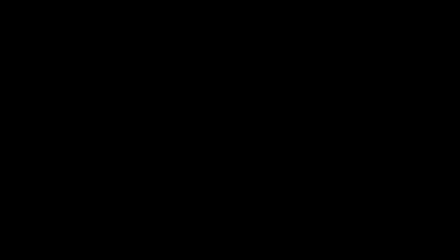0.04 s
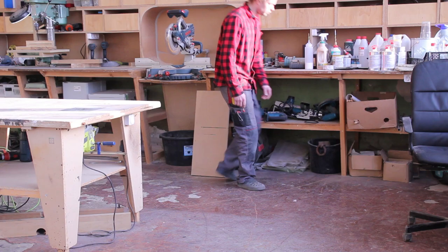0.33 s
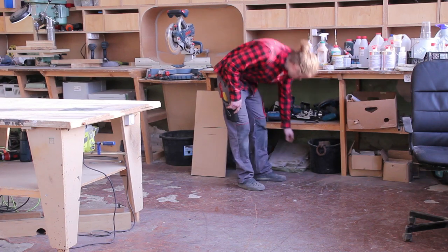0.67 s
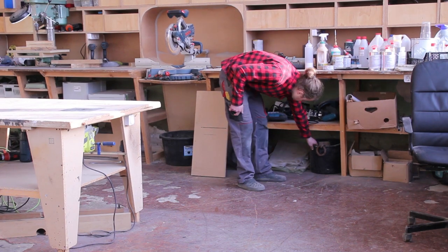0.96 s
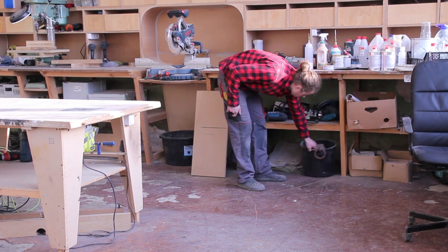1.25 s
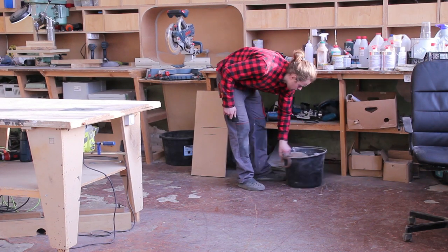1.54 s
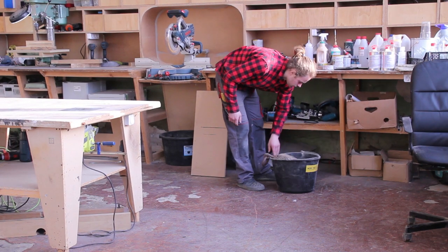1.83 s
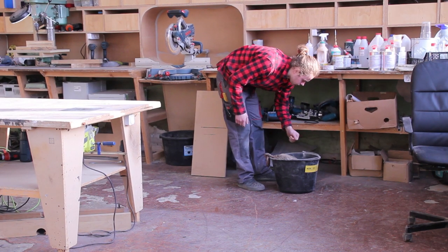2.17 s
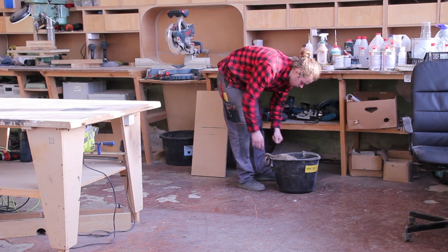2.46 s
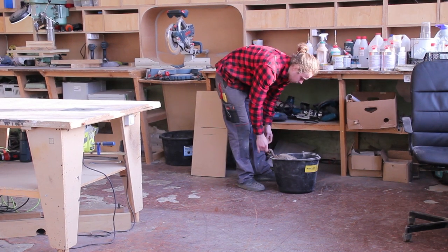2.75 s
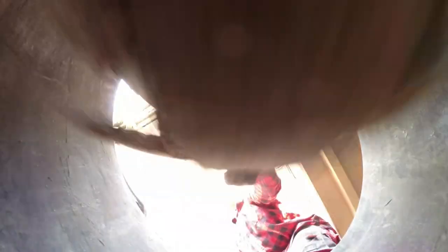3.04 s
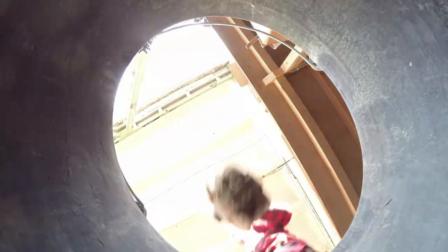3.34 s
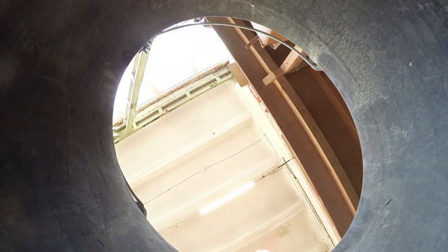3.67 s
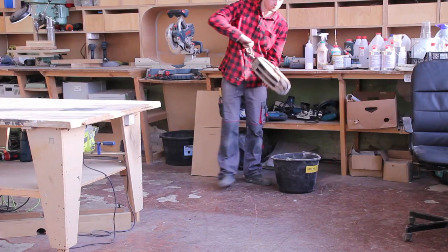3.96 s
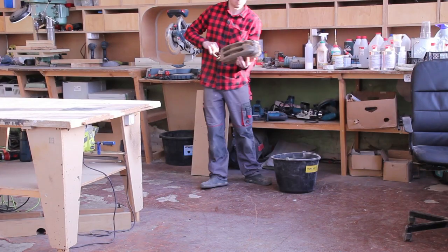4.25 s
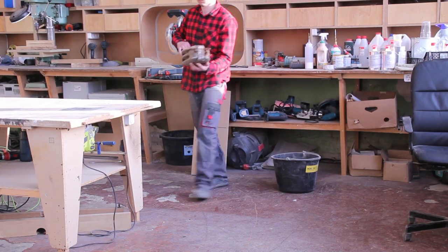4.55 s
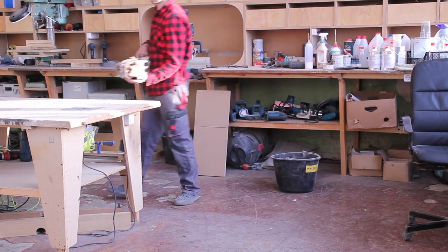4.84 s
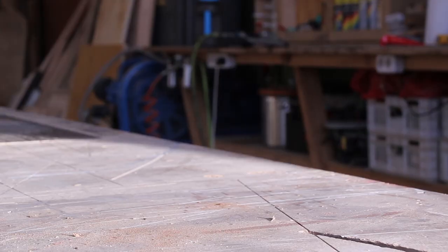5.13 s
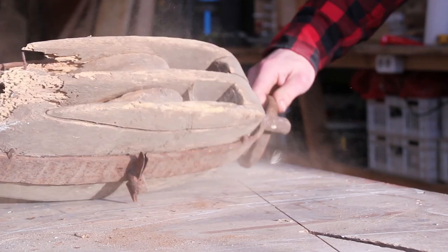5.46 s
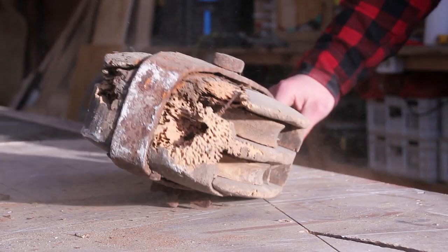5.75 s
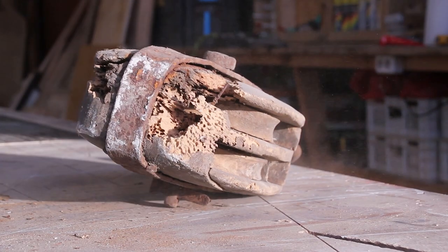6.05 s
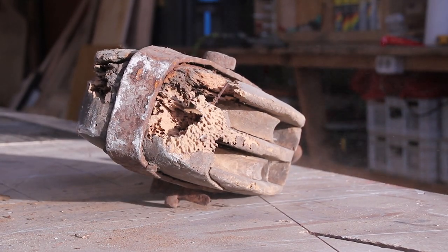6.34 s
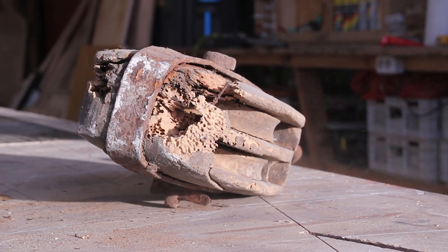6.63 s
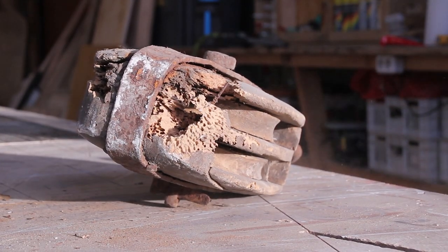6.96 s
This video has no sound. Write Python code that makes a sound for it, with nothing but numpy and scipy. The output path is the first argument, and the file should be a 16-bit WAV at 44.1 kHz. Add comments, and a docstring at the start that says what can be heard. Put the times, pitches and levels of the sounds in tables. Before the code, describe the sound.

Faint cricket-like chirps sit over quiet workshop room tone. A plastic tub scrapes across grit, then thuds and clacks as an old wooden block is hauled out, shedding chips into it. A soft hiss fills a short lull. Then comes the loudest sound, near the microphone: the block crashes onto a wooden table and rocks, rotten wood crunching, dust spraying and crumbs clicking down.

```python
"""Faint high chirps, like bush crickets, run throughout over room tone, with a far bird now and then.
At 1.2 s a plastic tub is dragged over a gritty workshop floor. An old iron-strapped pulley block knocks
about in it, is scraped up the wall and out by 3.1 s, and sheds chips that tock back into the tub.
A soft hiss swells in the pause. At 5.4 s the block slams onto a wooden table and rolls: the top booms,
rotten wood crunches, dust sprays and crumbs patter down."""
import sys
import numpy as np
from scipy import signal
from scipy.fft import rfft, irfft, next_fast_len
from scipy.io import wavfile

SR = 44100
rng = np.random.default_rng(int(sys.argv[2]) if len(sys.argv) > 2 else 0)


def generate_wav(sig):
    """Save sig (samples, or channels by samples) to the path in sys.argv[1] as 16-bit PCM at SR."""
    pcm = np.round(np.clip(np.atleast_2d(sig).T, -1, 1) * 32767).astype(np.int16)
    wavfile.write(sys.argv[1], SR, pcm)


N = 308635
T = np.arange(N) / SR
HIT_T = T[:16384]  # time axis of a one-shot
FFT_SIZE = next_fast_len(N)

# Cues for the drag, the lift and the landing.
DRAG_START_S, TUG_S, DROP_S, DRAG_STOP_S = 1.158, 1.784, 1.982, 2.27
GRIP_S, SHIFT_S, LIFT_S, CLEAR_S, TUB_STILL_S = 2.375, 2.41, 2.675, 3.075, 3.64
SLAM_S, CRASH_S, TIP_S, REST_S = 5.3912, 5.446, 6.37, 6.715

# Tone of the landing, from the blow to the debris. Each row: frequency in Hz, level in dB.
BLOW_EQ = [(60, -26.5), (200, -15.5), (450, 0.5), (900, -4.5), (1400, -5.5), (3000, -10), (8000, -34),
           (16000, -36.5)]
CRACK_EQ = [(120, -39), (200, -37), (401, -2.5), (569, -4), (916, -8.5), (1080, -7), (1370, -28.5),
            (2750, -12), (5420, -20), (6400, -14), (7970, -22), (11900, -25), (16000, -52.5)]
TABLE_EQ = [(25, -15), (45, -16.5), (85, -8), (115, -4.5), (150, -0.5), (205, 2.5), (250, -2), (365, -1.5),
            (540, -5.5), (650, -14), (720, -9), (1000, -29)]
CRUNCH_EQ = [(290, -35.5), (500, -12.5), (561, -4.5), (787, -3.5), (1130, -2), (1610, -5.5), (1720, -4.5),
             (2210, -7.5), (2400, -8), (2940, -13.5), (3240, -12.5), (3710, -23), (4200, -16.5),
             (5460, -41), (9240, -120)]
DULL_CRUNCH_EQ = [(290, -30.5), (500, -15.5), (629, 1), (662, -5.5), (875, -7), (1210, -5), (1330, -9),
                  (1760, -13.5), (2510, -14.5), (2640, -14), (3800, -27), (4940, -50), (8360, -120)]
COARSE_DUST_EQ = [(1760, -18), (3000, 3), (3240, -2.5), (5220, -4), (6300, -5.5), (9010, -11), (12500, -14),
                  (16000, -19)]
FINE_DUST_EQ = [(1880, -23.5), (3200, -9), (4990, -9), (7280, -4), (9340, -4.5), (11100, 1), (15200, -5),
                (16000, -5)]
CRUMB_EQ = [(500, -34), (2000, -8), (4000, -8.5), (7000, -0.5), (12000, 2), (16000, -1)]
# Tone of the tub dragging over grit and stones. Each row: frequency in Hz, level in dB.
TUB_WALL_EQ = [(500, -20), (1000, -11), (1170, -10), (1270, -0.5), (1380, 2), (1490, -12), (1650, 0),
               (1780, -6.5), (2370, -8.5), (2900, -13.5), (4500, -27.5), (9000, -44)]
TUB_DRONE_EQ = [(70, -10.5), (130, -2.5), (210, 0.5), (310, -2), (420, -4), (700, -8), (950, -10.5),
                (1200, -32.5)]
GRIT_EQ = [(1000, -28), (2000, 0), (3300, -1), (5000, -2.5), (7000, -0.5), (10000, 0), (13000, -2),
           (16000, -9)]
STONE_EQ = [(1500, -8), (5000, -9.5), (9000, -2), (11000, 9.5), (16000, -3.5)]
# Tone of the block and its chips moving in the tub. Each row: frequency in Hz, level in dB.
CLACK_EQ = [(180, -33), (300, -7.5), (486, -5.5), (589, -10.5), (1180, -6.5), (1650, -0.5), (2130, -7),
            (2310, -4), (2760, -2), (3190, -17), (3510, -10), (4060, -30.5), (4400, -23.5), (14000, -70.5)]
CHAFE_EQ = [(900, -13), (1300, -4), (1800, 2), (2400, -6), (3100, -0.5), (3600, -22), (7000, -29)]
RASP_EQ = [(600, -2.5), (950, -2.5), (1900, 4), (3200, -3.5), (3900, -13), (4500, -6.5), (5200, -14.5),
           (7300, -16.5), (10000, -31.5), (15000, -41.5)]
HOLLOW_RUB_EQ = [(41, -38), (70, -8), (199, 0), (284, -1), (464, -21.5), (533, -14.5), (653, -22.5),
                 (750, -22.5), (900, -43), (1170, -68.5), (1980, -120)]
TUB_SWAY_EQ = [(15, -9.5), (30, -1), (42, -9), (60, -14), (85, -15.5), (120, -24), (300, -63.5)]
CHIP_TOCK_EQ = [(300, -13), (1100, -14), (1850, 0.5), (2200, -3.5), (2650, 0.5), (3400, -16), (4500, -21),
                (6500, -33), (9000, -44), (14000, -63)]
CHIP_CLICK_EQ = [(2000, -9.5), (3800, 1.5), (6500, -6.5), (9000, -12), (14000, -22)]
# Tone of the cricket wings, the soft hiss and the room. Each row: frequency in Hz, level in dB.
WING_EQ = [(4000, -54.5), (7000, -26.5), (8500, -19.5), (9500, -8), (11000, -3), (12500, -3.5),
           (14900, -14.5), (16000, -23)]
WASH_EQ = [(300, 0), (900, -1.5), (1700, -2), (2500, 2), (3500, -4), (5000, -11), (9000, -17.5)]
ROOM_EQ = [(20, -6.5), (33, -3), (55, -5), (85, -8.5), (160, -16.5), (235, -18), (320, -26), (1300, -36),
           (2400, -40), (8500, -43.5), (13000, -44.5), (16000, -49)]

# Resonances of wood, iron and plastic. Each row: pitch in Hz, level in dB, seconds to fall 60 dB.
BLOCK_MODES = [(543, 1.5, 0.12), (618, -5, 0.3), (1260, -4.5, 0.19), (1810, -9.5, .3), (1960, -2.5, 0.42),
               (2435, 0.5, .25), (2780, -8.5, .3)]
IRON_MODES = [(2396, -3.5, 0.23), (2930, -0.5, 0.052), (4200, -10.5, 0.075), (4530, -8.5, 0.14),
              (4730, -8, 0.16), (6202, -31.5, 0.14)]
STRAP_MODES = [(2932, -4, 0.26), (2930, -11, .15), (5900, -16, 0.15)]
TUB_WALL_MODES = [(100.6, -6, 0.064), (197.8, 1.5, 0.087), (245, -1, 0.12), (325, -10, 0.077),
                  (433, -11, 0.11)]
TUB_BOTTOM_MODES = [(35.8, -6, 0.34), (123, 0, 0.16)]

# The block rocking on the table. Each row: start in seconds, bump, crunch and snap levels in dB,
# decay in seconds.
BREAK_HITS = [(5.453, -19.5, -21, -20, 0.018), (5.525, -19, -16, -25, 0.02),
              (5.696, -39, -17.5, -14, 0.0035), (5.888, -36, -23, -36.5, .0088),
              (5.928, -20, -32, -39, 0.0057), (5.974, -28, -18, -32.5, 0.0062),
              (6.095, -40, -31, -40, 0.007), (6.374, -26.5, -39, -66, 0.0048),
              (6.641, -48, -36, -57, 0.0085)]
# Large crumbs landing. Each row: start in seconds, click level in dB, strap ping level in dB.
CRUMB_HITS = [(5.6136, -21, -70), (5.722, -13, -70), (5.932, -19, -72), (5.9624, -24, -70),
              (6.06, -16.5, -70), (6.187, -22, -62), (6.252, -23, -70), (6.5033, -17, -40.5),
              (6.521, -18, -60), (6.576, -14.5, -49), (6.7067, -23.5, -50.5), (6.737, -26, -65),
              (6.7517, -19, -51), (6.805, -34.5, -50.5), (6.8758, -23, -59), (6.9022, -28, -55),
              (6.9606, -24.5, -49.5)]
# Stones catching under the tub. Each row: start in seconds, level in dB.
STONE_HITS = [(1.249, -27), (1.306, -20), (1.375, -9.5), (1.481, -11.5), (1.799, -20), (1.826, -16),
              (2.058, -19), (2.139, -16.5)]
# The block knocking in the tub. Each row: start in seconds, wall thud, bottom drum and clack levels
# in dB, clack decay in seconds, iron ring level in dB.
KNOCK_HITS = [(1.604, -53, -70, -20, 0.0023, -80), (1.984, -33, -46, -24, .007, -79),
              (2.003, -34, -40, -23.5, 0.0072, -77), (2.493, -16.5, -55, -35, 0.011, -49.5),
              (2.572, -14, -47.5, -35, 0.0065, -26), (2.624, -12, -42.5, -15, 0.0096, -54),
              (2.6696, -17, -20, -10, 0.0073, -47), (2.76, -50, -27.5, -44, .007, -80),
              (3.086, -27, -20.5, -17, .008, -52)]
# Chips falling into the tub. Each row: start in seconds, tock level in dB, click level in dB.
CHIP_HITS = [(3.119, -20, -72), (3.1509, -31, -37), (3.1557, -24, -43), (3.1742, -29, -57),
             (3.186, -36, -75), (3.2057, -26.5, -60), (3.306, -34.5, -73), (3.3294, -33.5, -70),
             (3.388, -35, -80), (3.4211, -17, -50), (3.4253, -28, -45), (3.5103, -41, -46.5),
             (3.585, -37.5, -45), (3.6487, -32.5, -27.5), (3.8248, -36.5, -37.5), (3.8922, -39, -45)]
# Cricket chirps. Each row: start in seconds, level of the last stroke in dB.
CRICKET_CHIRPS = [(0.135, -43.5), (.379, -60), (.615, -62), (.874, -50), (2.08, -42.5), (2.55, -59.5),
                  (2.675, -61), (2.95, -50), (3.277, -49), (3.659, -59), (3.924, -43), (4.418, -51),
                  (4.808, -49.5), (5.2, -59), (6.352, -53), (6.727, -53)]
# A far bird. Each row: start and length in seconds, first and last pitch in Hz, level in dB.
BIRD_NOTES = [(.865, 0.06, 2000, 1910, -75), (4.806, 0.054, 2096, 1970, -60),
              (4.84, 0.052, 2250, 2430, -62)]
# Swells of soft hiss. Each row: centre and half width in seconds, level in dB.
HISS_SWELLS = [(4.03, 0.15, -66), (4.45, 0.65, -68.5), (5.16, .18, -64)]
# The room tone's fader. Each row: time in seconds, level in dB.
ROOM_FADER = [(.07, -49.5), (1.1, -52.5), (2.3, -52.5), (4.0, -49), (5.3, -50), (7, -52)]
# How alike the room is in both ears. Each row: frequency in Hz, correlation from 0 to 1.
ROOM_CORRELATION = [(30, 0.34), (120, 0.2), (500, 0.44), (2000, .15), (12000, 0.022)]


def slam():
    """The block lands: a heavy blow, then a crack as the wood gives."""
    out = np.zeros(N)
    add(out, SLAM_S, amp(5.5) * burst(BLOW_EQ, .004))
    add(out, SLAM_S + .0083, amp(-9) * burst(CRACK_EQ, .004) + amp(-15.5) * burst(CRACK_EQ, .017))
    return out


def block_roll(fade_db_per_s=5.5):
    """The table booms and rotten wood crunches as the block crashes on its side, rolls and tips."""
    roll = envelope(SLAM_S, attack_s=.014, hold_s=.62, fall_db_per_s=35.5)
    roll *= amp(-fade_db_per_s * np.maximum(T - SLAM_S, 0)) * judder(rate_hz=40, depth_db=1.17)
    boom_gain = (amp(-23.5) * roll
                 + amp(-16.5) * envelope(CRASH_S, attack_s=.04, hold_s=.063, fall_db_per_s=220)
                 + amp(-37) * envelope(TIP_S, attack_s=.0085, hold_s=.095, fall_db_per_s=45))
    crunch_gain = (amp(-26.5) * roll
                   + amp(-26.5) * envelope(CRASH_S, attack_s=.016, hold_s=.077, fall_db_per_s=282)
                   + amp(-50.5) * envelope(TIP_S, attack_s=.16, hold_s=.046, fall_db_per_s=15))
    boom = stereo(table_boom(), table_boom(), .7 * crash_width()) * boom_gain
    crunch = stereo(wood_crunch(), wood_crunch(), .3 * crash_width()) * crunch_gain
    return (amp(-2) * boom + amp(-.83) * crunch) * until(REST_S, release_s=.011)


def table_boom():
    """Small blows keep the table top's many modes going."""
    return unit_rms(echoes(grains(TABLE_EQ, 3000, .7), t60=.24, wet_db=-8))


def wood_crunch():
    """Fractures ring the rotten block; the crunch dulls and the ring comes up as the roll dies out."""
    dullness = np.clip((T - 5.8) / .58, 0, 1)
    cracks = np.sqrt(1 - dullness) * grains(CRUNCH_EQ, 3000, 2.5)
    cracks += np.sqrt(dullness) * grains(DULL_CRUNCH_EQ, 3000, 2.4)
    ringing = unit_rms(signal.oaconvolve(cracks, ring(BLOCK_MODES))[:N])
    crunch = unit_rms(echoes(cracks * judder(60, 1), t60=.19, wet_db=-5))
    return crunch + amp(-18.5 + 14.5 * dullness) * ringing


def crash_width():
    """The crash spreads wide, then draws in to the centre."""
    return .006 + envelope(CRASH_S, attack_s=.0055, hold_s=.091, fall_db_per_s=140)


def breaks():
    """The rocking block bumps the table and snaps off splinters."""
    out = np.zeros(N)
    for start, bump_db, crunch_db, snap_db, decay_s in BREAK_HITS:
        add(out, start, amp(bump_db) * burst(TABLE_EQ, 2 * decay_s))
        add(out, start, amp(crunch_db) * burst(CRUNCH_EQ, decay_s))
        add(out, start, amp(snap_db) * burst(COARSE_DUST_EQ, decay_s))
    return out


def dust():
    """Coarse dust puffs on the slam, sprays on the crash and spills in the roll; fine dust trickles on."""
    puff = envelope(SLAM_S, attack_s=.01, hold_s=.02, fall_db_per_s=121)
    spray = envelope(CRASH_S, attack_s=.012, hold_s=.015, fall_db_per_s=207)
    spill = envelope(SLAM_S, attack_s=.02, hold_s=.38, fall_db_per_s=50)
    trickle = np.clip((T - SLAM_S) / .02, 0, 1)
    width = .083 + .37 * crash_width()
    coarse = stereo(grains(COARSE_DUST_EQ, 5500, 3.8), grains(COARSE_DUST_EQ, 6000, 4), width)
    coarse *= amp(-34.5) * puff + amp(-24) * spray + amp(-38) * spill
    fine = stereo(grains(FINE_DUST_EQ, 3500, 6.3), grains(FINE_DUST_EQ, 3500, 5.5), width=.67)
    return coarse + amp(-54.5) * fine * trickle


def crumbs(small_per_s=6, small_db=-27.5):
    """Crumbs click across the table, small ones at random among the large; some ping off the strap."""
    mid, side = np.zeros((2, N))
    small_starts = T[(rng.random(N) < small_per_s / SR) & (T > CRASH_S)]
    small = [(start, small_db, -np.inf) for start in small_starts]
    for start, click_db, ping_db in CRUMB_HITS + small:
        click = amp(click_db - 1) * tick(CRUMB_EQ, rattle_db=-15, rattle_s=.0017)
        add(mid, start, click)
        add(mid, start, amp(ping_db) * ring(STRAP_MODES, detune=.0052))
        add(side, start, rng.uniform(-1.2, 1) * click)
    return np.array([echoes(ear, t60=.1, wet_db=-10) for ear in stereo(mid, side, width=.66)])


def tub_drag(speed_up_s=.34, brake_s=.25, flat_db=-2):
    """Grit hisses under the tilted tub and shakes its walls with its speed; a tug, and it drops flat."""
    speed = np.clip((T - DRAG_START_S) / speed_up_s, 0, 1) * until(DRAG_STOP_S, brake_s) ** 2.28
    tilted = until(DROP_S + .036, release_s=.03)
    tug = envelope(TUG_S, attack_s=.053, hold_s=.07, fall_db_per_s=55) * tilted
    drop = envelope(DROP_S, attack_s=.0066, hold_s=.02, fall_db_per_s=152)
    scrape_gain = amp(flat_db * (1 - tilted))  # lying flat, it scrapes more softly
    wall = grains(TUB_WALL_EQ, 1200, 1.5) * amp(-28 + 1.4 * tug) * speed ** .97
    wall *= judder(rate_hz=32, depth_db=.66)
    hiss = grains(GRIT_EQ, 9000, 4.1) * amp(-28.5 + 6.3 * tug) * speed ** 1.17
    drone = grains(TUB_DRONE_EQ, 900, 2.1) * (amp(-39.5) * speed ** .81 + amp(-31.5) * drop)
    out = (scrape_gain * (wall + hiss) + drone) * judder(rate_hz=60, depth_db=1.38)
    for start, db in STONE_HITS:
        add(out, start, amp(db) * tick(STONE_EQ, rattle_db=-7.5, rattle_s=.002))
    return amp(-1) * echoes(out, t60=.064, wet_db=-7)


def tub_knocks(rebound_s=.0095, rebound_db=-4.5):
    """Each knock thuds the tub and rings the iron; the wood clacks, and again on the rebound."""
    out = np.zeros(N)
    soft_attack = 1 - np.exp(-HIT_T / .0025)  # rotten wood gives, so the ringing builds up
    for start, thud_db, drum_db, clack_db, decay_s, iron_db in KNOCK_HITS:
        thud = amp(thud_db - 3) * ring(TUB_WALL_MODES, detune=.064)
        drum = amp(drum_db) * ring(TUB_BOTTOM_MODES)
        iron = amp(iron_db) * ring(IRON_MODES)
        clack = amp(clack_db) * burst(CLACK_EQ, decay_s, attack_s=.00138)
        rebound = amp(clack_db + rebound_db) * burst(CLACK_EQ, .7 * decay_s, attack_s=.0012)
        add(out, start, soft_attack * (thud + drum + iron) + clack)
        add(out, start + rebound_s, rebound)
    return out


def block_slide(swell_db_per_s=66, cut_db_per_s=350):
    """A hand grips and shifts the block; it rasps ever louder up the wall, then the tub rocks to rest."""
    grip = envelope(GRIP_S, attack_s=.016, hold_s=.05, fall_db_per_s=1500)
    shift = envelope(SHIFT_S, attack_s=.061, hold_s=.19, fall_db_per_s=200)
    lift = envelope(LIFT_S, attack_s=.02, hold_s=.41, fall_db_per_s=330)
    haul = amp(np.minimum(swell_db_per_s * (T - CLEAR_S), cut_db_per_s * (CLEAR_S - T))) * (T > SHIFT_S)
    rocking = envelope(LIFT_S, attack_s=.015, hold_s=.44, fall_db_per_s=6)
    rocking *= until(TUB_STILL_S, release_s=.07)
    # The bottom springs up as the weight leaves it.
    heave = envelope(LIFT_S, attack_s=.015, hold_s=.072, fall_db_per_s=60)
    chafe = grains(CHAFE_EQ, 1200, 2.3) * amp(-47) * grip
    rasp = grains(RASP_EQ, 3000, 3.16) * judder(rate_hz=70, depth_db=1.9)
    rasp *= amp(-31) * haul + amp(-62) * (shift + rocking)
    rub = grains(HOLLOW_RUB_EQ, 500, 2.2) * judder(rate_hz=20, depth_db=1.6)
    rub *= amp(-37) * shift + amp(-41) * lift + amp(-39.5) * haul + amp(-56.5) * rocking
    sway = grains(TUB_SWAY_EQ, 800, 1.1)
    sway *= amp(-37.5) * heave + amp(-44.5) * lift + amp(-43.5) * rocking
    return chafe + rasp + rub + sway


def chips():
    """Chips drop back into the tub with a hollow tock; sharp ones also click."""
    out = np.zeros(N)
    for start, tock_db, click_db in CHIP_HITS:
        add(out, start, amp(tock_db) * tick(CHIP_TOCK_EQ, rattle_db=-6.5, rattle_s=.0023))
        add(out, start, amp(click_db) * tick(CHIP_CLICK_EQ, rattle_db=-4, rattle_s=.0014))
    return echoes(out, t60=.16, wet_db=-15.5)


def crickets(stroke_s=.029, spacing_s=.03, growth_db=4):
    """Three raspy wing strokes a chirp, building in level."""
    strokes = np.zeros(N)
    shape = np.sin(np.pi * np.minimum(HIT_T / stroke_s, 1)) ** 2
    for start, db in CRICKET_CHIRPS:
        for k, (jitter, jitter_db) in enumerate(rng.standard_normal((3, 2))):
            gain = amp(db - growth_db * (2 - k) + jitter_db)
            add(strokes, start + k * spacing_s + .002 * jitter, gain * shape)
    mid, side = (echoes(strokes * grains(WING_EQ, 2500, 2.8), t60=.18, wet_db=-7.5) for _ in range(2))
    return stereo(mid, side, width=.7)


def bird():
    """A few faint gliding whistles, far back in the reverb."""
    out = np.zeros(N)
    for start, length_s, first_hz, last_hz, db in BIRD_NOTES:
        hz = np.linspace(first_hz, last_hz, int(length_s * SR))
        add(out, start, amp(db) * np.hanning(len(hz)) * np.sin(2 * np.pi * np.cumsum(hz) / SR))
    return np.array([echoes(out, t60=.3, wet_db=3), echoes(out, t60=.22, wet_db=10.5)])


def wash():
    """A soft, wide hiss that comes and goes in the room."""
    gain = sum(amp(db) * np.exp(-((T - centre) / half_s) ** 2) for centre, half_s, db in HISS_SWELLS)
    return stereo(grains(WASH_EQ, 26000, .94), grains(WASH_EQ, 20000, .99), width=.5) * gain


def room_tone(low_cut_hz=12):
    """A bed of low rumble and thin hiss, only partly alike in the two ears."""
    hz = np.fft.rfftfreq(FFT_SIZE, 1 / SR)
    left, unrelated = rfft(rng.standard_normal((2, FFT_SIZE)))
    alike = curve_at(ROOM_CORRELATION, hz)
    right = alike * left + np.sqrt(1 - alike ** 2) * unrelated
    tone = amp(curve_at(ROOM_EQ, hz)) * hz ** 2 / (hz ** 2 + low_cut_hz ** 2)
    bed = irfft(np.array([left, right]) * tone, FFT_SIZE)[:, :N]
    fader_db = np.interp(T, *np.transpose(ROOM_FADER), left=-150, right=-150)
    return amp(fader_db - 1) * unit_rms(bed)


def grains(eq, per_s, spread_db):
    """Random tiny slips and fractures, a few of them large, ringing a body; rms 1."""
    chance, size, sign = rng.random((3, N))
    at = chance < per_s / SR
    clicks = np.zeros(N)
    clicks[at] = amp(spread_db * np.minimum(-np.log(size[at]), 4)) * np.sign(sign[at] - .5)
    return unit_rms(colour(clicks, eq))


def judder(rate_hz, depth_db):
    """The uneven gain of stick and slip."""
    rolloff = 1 + (np.fft.rfftfreq(FFT_SIZE, 1 / SR) / rate_hz) ** 4
    wobble = irfft(rfft(rng.standard_normal(FFT_SIZE)) / rolloff, FFT_SIZE)[:N]
    return unit_rms(amp(depth_db * unit_rms(wobble)))


def burst(eq, decay_s, attack_s=.00034):
    """A rough contact: dying noise through a body."""
    fade = np.exp(-HIT_T / decay_s) * (1 - np.exp(-HIT_T / attack_s))
    hit = colour(rng.standard_normal(len(HIT_T)) * fade, eq)
    return hit / np.linalg.norm(hit) * np.sqrt(decay_s * SR / 2)


def tick(eq, rattle_db, rattle_s):
    """A small hard impact: one sharp click and a brief rattle."""
    click = impulse_response(eq)
    return click / abs(click).max() + amp(rattle_db) * burst(eq, rattle_s)[:len(click)]


def ring(modes, detune=0):
    """Dying modes, detuned a little by where the blow lands."""
    out = np.zeros(len(HIT_T))
    for hz, db, t60 in modes:
        pitch = hz * (1 + detune * rng.uniform(-1.03, 1))
        out += amp(db - 60 * HIT_T / t60) * np.sin(2 * np.pi * pitch * HIT_T)
    return out


def echoes(x, t60, wet_db):
    """Adds a tail of sparse reflections that falls 60 dB in t60 seconds."""
    taps = rng.standard_normal(len(HIT_T)) * (rng.random(len(HIT_T)) < 2000 / SR)
    taps *= amp(-60 * HIT_T / t60)
    return x + amp(wet_db) * signal.oaconvolve(x, taps / np.linalg.norm(taps))[:N]


def impulse_response(eq, size=4096):
    """A body's minimum-phase click, energy 1, rolling off 18 dB an octave past the curve's ends."""
    hz = np.abs(np.fft.fftfreq(size, 1 / SR)) + 1
    octaves_out = np.maximum(np.log2(eq[0][0] / hz), 0) + np.maximum(np.log2(hz / eq[-1][0]), 0)
    log_gain = np.log(amp(np.maximum(curve_at(eq, hz) - 18 * octaves_out, -100)))
    taps = np.fft.ifft(np.exp(np.conj(signal.hilbert(log_gain)))).real
    return taps / np.linalg.norm(taps)


def colour(x, eq):
    """Plays x through a body with this tone."""
    return signal.oaconvolve(x, impulse_response(eq))[:len(x)]


def curve_at(points, hz):
    """Reads a curve on a log-frequency axis."""
    point_hz, values = np.transpose(points)
    return np.interp(np.log(hz + 1), np.log(point_hz + 1), values)


def envelope(start, attack_s, hold_s, fall_db_per_s):
    """Rises to 1, holds, then dies away."""
    t = T - start
    return np.clip(t / attack_s, 0, 1) * amp(-fall_db_per_s * np.maximum(t - attack_s - hold_s, 0))


def until(end, release_s):
    """Stays at 1, then fades to silence at the end."""
    return np.clip((end - T) / release_s, 0, 1)


def stereo(mid, side, width):
    """Left and right from mid and side."""
    return np.array([mid + width * side, mid - width * side])


def add(mix, start, sound):
    """Drops a sound into the mix at start seconds."""
    part = mix[round(start * SR):][:len(sound)]
    part += sound[:len(part)]


def amp(db):
    """Decibels to gain."""
    return 10 ** (np.asarray(db) / 20)


def unit_rms(x):
    """Scales to rms 1."""
    return x / np.sqrt(np.mean(x ** 2) + 1e-20)


def scene():
    """The tub and the block in the centre, the workshop around them."""
    tub = tub_drag() + echoes(block_slide() + tub_knocks(), t60=.1, wet_db=-24.5) + chips()
    table = slam() + block_roll() + dust() + breaks() + crumbs()
    return tub + table + crickets() + bird() + wash() + room_tone()


def record(dry):
    """The slam overloads into a hard clip; a steep low-pass trims the very top."""
    ceiling, cutoff_hz = .57, 16100
    lowpass = signal.firwin(511, cutoff_hz, window=("kaiser", 9), fs=SR)
    return signal.oaconvolve(np.clip(dry, -ceiling, ceiling), lowpass[None], "same")


dry = scene()
out = record(dry)
generate_wav(out)
```